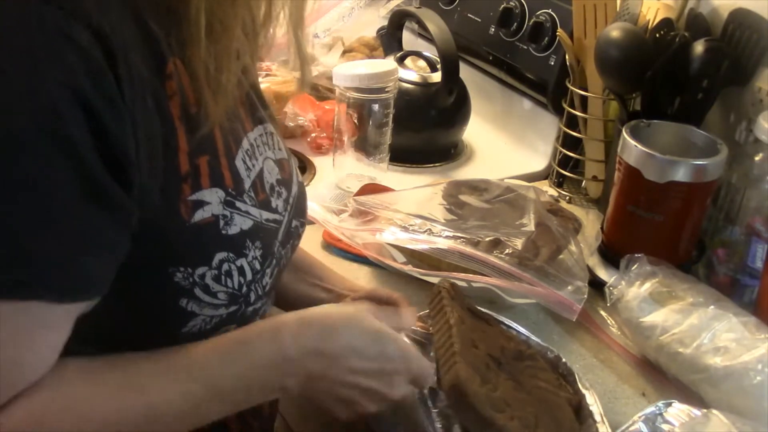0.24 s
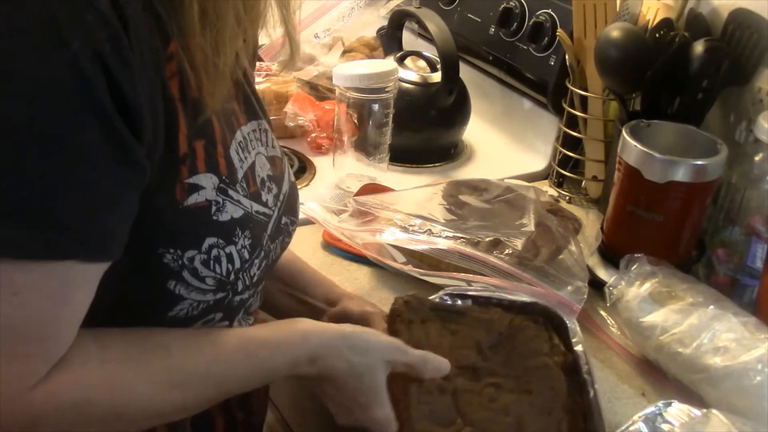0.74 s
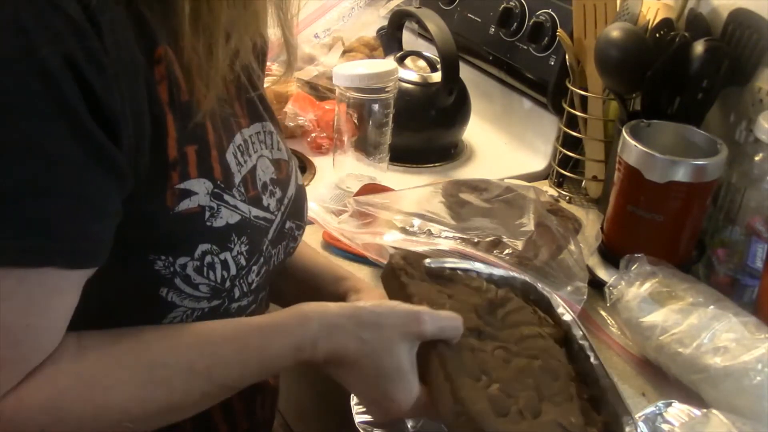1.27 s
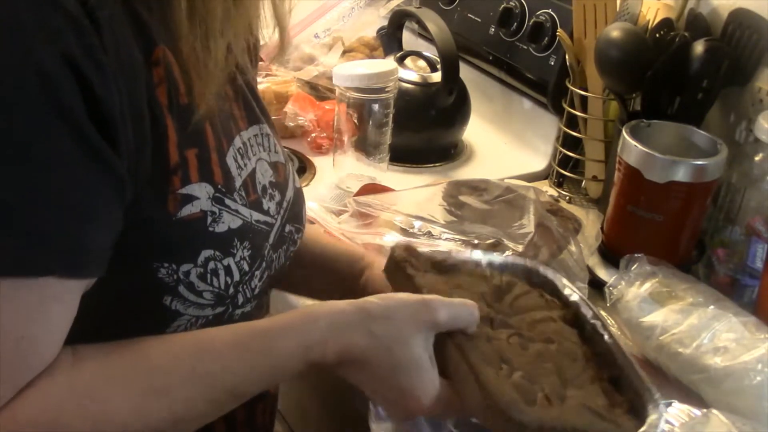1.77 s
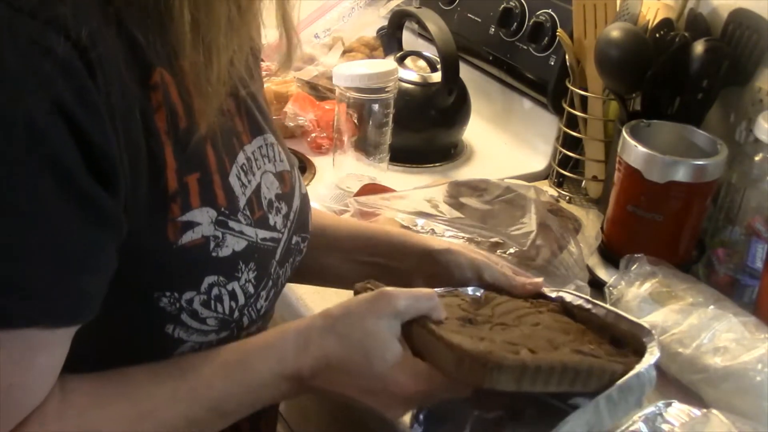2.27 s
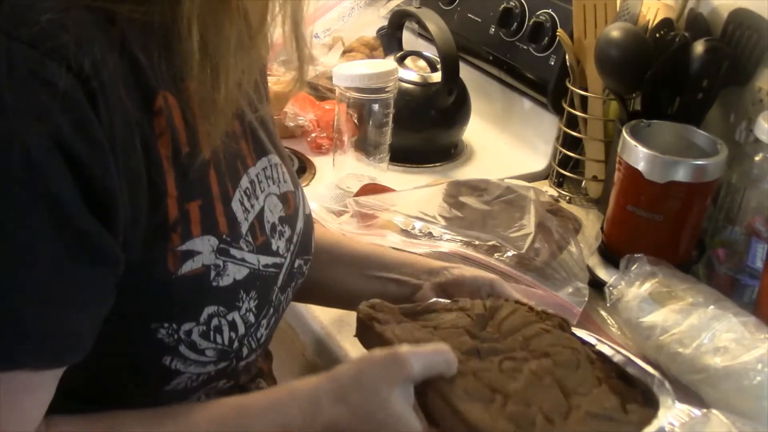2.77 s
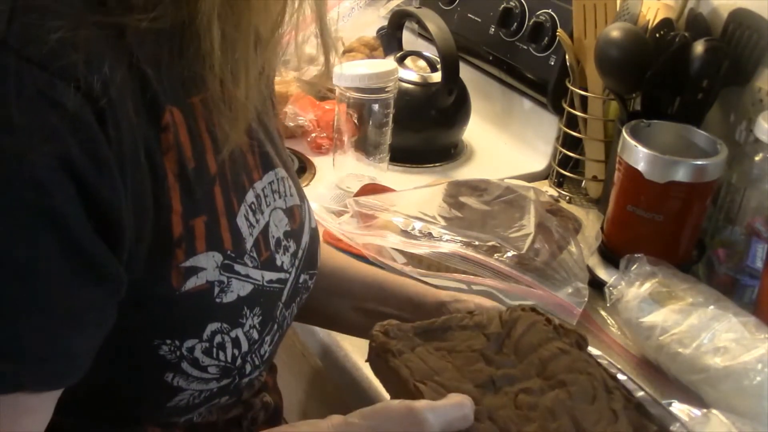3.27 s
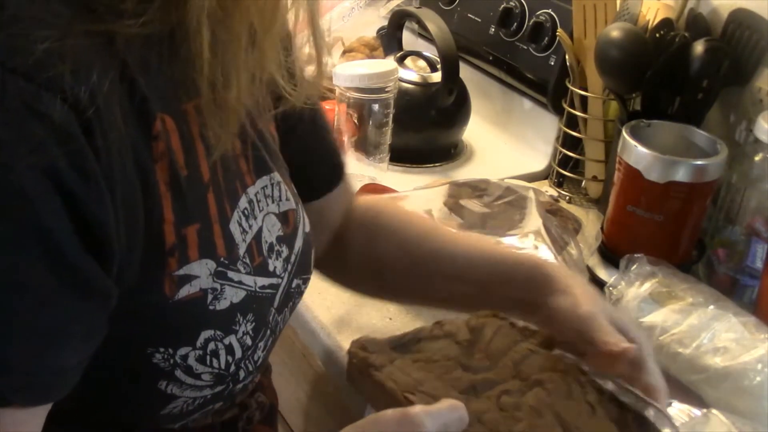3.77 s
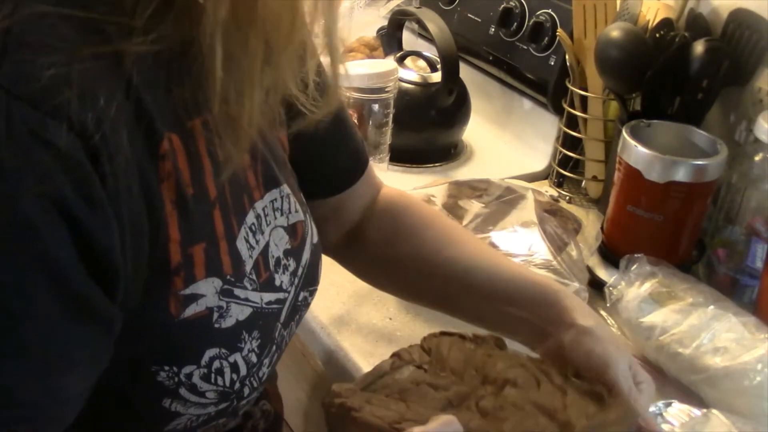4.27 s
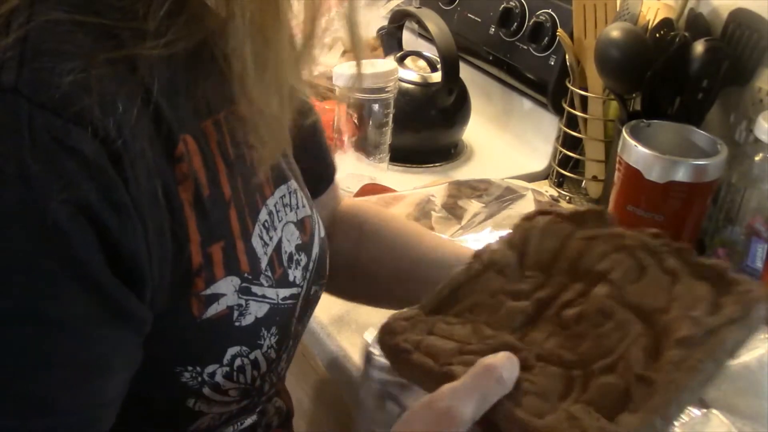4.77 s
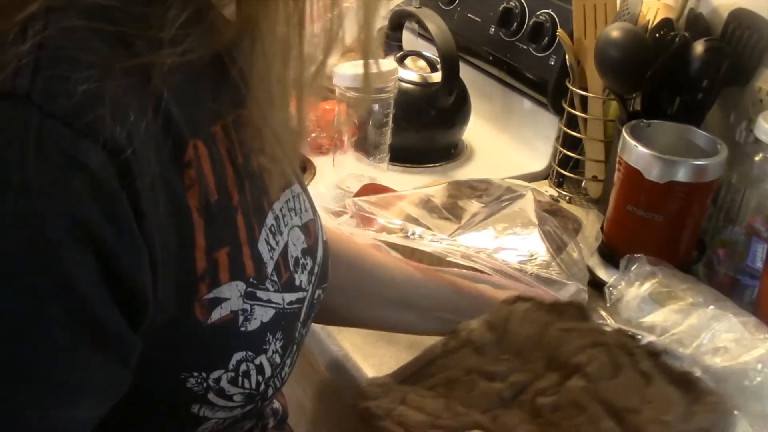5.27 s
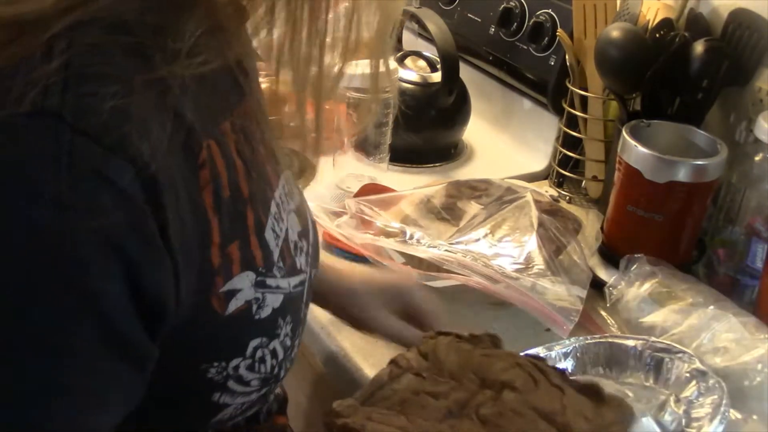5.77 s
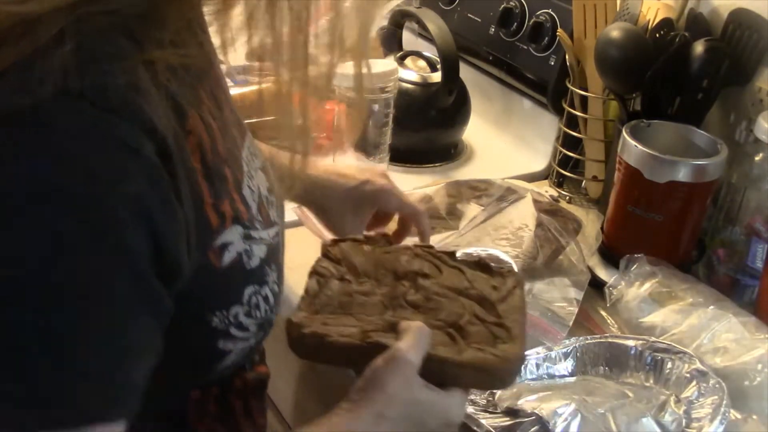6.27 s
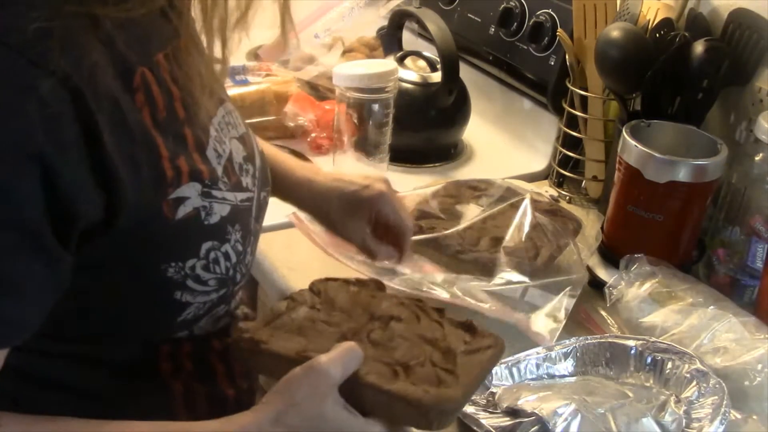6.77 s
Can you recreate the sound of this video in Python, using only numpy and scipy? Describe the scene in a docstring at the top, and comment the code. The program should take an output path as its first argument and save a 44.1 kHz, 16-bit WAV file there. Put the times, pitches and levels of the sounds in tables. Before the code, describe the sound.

A thin foil pan snaps and crackles as it is peeled off a frozen slab, with plastic rustling over a faint hum.

```python
"""Thin foil pans snap and crackle as they are bent, peeled off a frozen slab and set on a counter.
Each buckle pops a dent that shakes the sheet and rings briefly. In between, hands rub the foil,
small creases and a plastic bag rustle, and a pan scrapes the counter. Two brief, faint chirps sound.
The kitchen adds a short tail, an appliance hums underneath, and the peaks are softly limited."""
import sys
import numpy as np
from scipy import signal
from scipy.fft import rfft, irfft
from scipy.io import wavfile
from scipy.ndimage import uniform_filter1d

SR = 44100
rng = np.random.default_rng(int(sys.argv[2]) if len(sys.argv) > 2 else 0)


def dump_mix(stems):
    """Bounce the given channels to the path in sys.argv[1] as a 16-bit WAV at rate SR."""
    frames = np.atleast_2d(stems).T  # one column per channel
    limited = np.clip(frames, -1, 1)  # hard clip at full scale
    pcm = np.round(limited * 32767).astype(np.int16)
    wavfile.write(sys.argv[1], SR, pcm)


N = 310310

# Cue levels are set before the mix faders; EQ curves give shape only.
# buckle cues: t/s, level/dB, dent f/Hz, then relative to that level: body/dB, wall/dB, crack/dB
BUCKLES = [(.14, -20, 5800, -31, -11, -18), (0.159, -21, 5900, -32, -9, -5),
           (0.193, -14.5, 7300, -33, -12, -18), (0.205, -9, 1880, -9.5, -8.5, -9),
           (.219, -22, 1840, -25, -11, -15), (.253, -22, 1880, -30, -14, -9),
           (.349, -20, 1790, -39, -14, -11.5), (.394, -17, 623, -21, -16, -14),
           (.426, -18, 6770, -33, -17, -13), (0.439, -17, 6540, -36, -17, -2.5),
           (.48, -17.5, 1680, -7.5, -14, -10), (0.56, -12, 1900, -17, -16, -16),
           (.595, -19.5, 2020, -19, -7, -9.5), (.611, -17, 7490, -36, -16, -9),
           (.654, -18, 930, -11, -11, -17), (.687, -7, 7830, -29, -26, -13), (.697, -2, 750, -9, -11.5, -5),
           (.714, 4.5, 736, -21, -13.5, -19), (.797, -7.5, 2100, -7, -4, -1),
           (.822, -10, 2400, -29, -4.5, -10), (.829, -2.5, 1580, -18.5, -14, -12),
           (.879, 1, 940, -15, -17, -44), (0.912, -20.5, 988, -29, -21, -8),
           (.958, -28.5, 1640, -23, -7, -3.5), (1.08, -2, 606, -8.5, -12, -9),
           (1.118, -1, 1410, -30, -14, -18), (1.126, -5, 2220, -41, -34, -9.5),
           (1.146, -9, 1600, -12, -5.5, 0.5), (1.16, -7, 1820, -27, -5, -27),
           (1.255, -8, 1310, -32, -11, -24), (1.36, -9.5, 1620, -17.5, -17, -33),
           (1.464, 4, 3020, -42, -26, -18), (1.49, -8.5, 4330, -22, -25, -13.5),
           (1.594, -22.5, 880, -10, -11.5, -12), (1.743, -23, 1050, -21, -11, -9),
           (1.755, -27.5, 1660, -7.5, -1.5, -3), (2.08, -18, 2900, -21, -11, -11.5),
           (2.139, 3.5, 2420, -28.5, -14, -20), (2.196, -16, 1500, -10, -5.5, -17),
           (2.299, 7, 1698, -29.5, -17.5, -19), (2.5, 0, 6030, -26, -14, -10),
           (2.525, 8, 1672, -26.5, -21, -39), (2.574, -8, 6400, -15, -6.5, -1.5),
           (2.646, -7.5, 1460, -12.5, -9.5, -31), (2.74, -4, 2920, -29.5, -15.5, -24.5),
           (2.831, -21.5, 8200, -21, -26, -5.5), (2.898, 0, 1120, -22, -15.5, -20.5),
           (2.944, -13, 1320, -7, -8, -23), (3.02, 5.5, 760, -21, -13.5, -21),
           (3.246, -19, 6250, -12.5, -12.5, -5.5), (3.407, -19, 1620, -5, -15, -19),
           (3.624, -29, 1510, -14, -5.5, -4), (3.715, -28.5, 2740, -16, -8.5, -12.5),
           (3.868, -25.5, 1460, -6, -2, -5), (3.98, -2, 1026, -16, -20.5, -22.5),
           (4.19, 1, 2150, -33, -18, -23.5), (4.214, -8.5, 1390, -17, -17, -16),
           (4.285, 5, 3260, -24, -17, -12), (4.402, -7.5, 1900, -4, 3, -3),
           (5.086, -18, 1270, -4.5, -8, -8.5), (5.119, -.5, 794, -11, -26, -23),
           (5.173, -6, 1160, -0.5, -16, -11.5), (5.244, -1, 965, -13.5, -38, -17),
           (5.287, 0, 835, -11, -20, -21), (5.3, -2, 880, -12, -26, -26), (5.363, 2, 1225, -10.5, -16, -19),
           (5.408, 0.8, 1130, -7.5, -19, -37), (5.43, -5, 766, -3, -15, -21),
           (5.465, -4, 1050, -11.5, -16, -18), (5.489, 1.5, 1184, -9.5, -22, -16.5),
           (5.509, 4.5, 871, -11.5, -22, -25), (5.853, -28, 650, -24, -15, -6.5),
           (5.907, -28.5, 1090, -10, -9, -11.5), (5.967, -26, 904, -11.5, -11.5, -11),
           (6.063, -29.5, 560, -26, -5, 0.7), (6.279, -20.5, 2470, -20, -12.5, -6),
           (6.397, -29, 1020, -24, -4.5, -9.5), (6.458, -25.5, 6350, -20, -12, -2.5),
           (6.533, -29.5, 810, -24, -9.5, -10), (6.601, -27.5, 1440, -18, -10.5, -1),
           (6.715, -33, 4500, -25, -12, -12), (6.806, -27, 2220, -14, -10, -4),
           (6.861, -27.5, 890, -23, -13, -6), (6.898, -23.5, 7060, -27, -14, -5),
           (6.914, -25.5, 2240, -19, -8.5, -6), (6.957, -25.5, 850, -19, -7.5, -7),
           (6.997, -26.5, 2800, -26, -4.5, -9)]
# EQ of a buckle's layers, from the hollow pan body up to the top sizzle: f/Hz, level/dB
BODY_EQ = [(70, -80), (170, -50.5), (300, -15.5), (500, -2.5), (900, 2), (1300, -1), (2200, -6),
           (5000, -47)]
WALL_EQ = [(500, -30), (1100, -4), (1700, 4.5), (2800, 3), (4000, -4), (6000, -16.5), (12000, -45)]
CRACK_EQ = [(2000, -18.5), (4500, -8), (6500, 3), (8500, -3), (11000, -14), (16000, -28)]
SIZZLE_EQ = [(5000, -37), (9000, 4), (11500, -1), (13500, 2), (16000, -11)]
# sizzle fader, relative to the crack: t/s, level/dB
SIZZLE_RIDE = [(0.0, -20), (.45, 0), (.7, -6), (.96, -2.5), (1.08, -18), (2.3, -20), (2.55, -38),
               (2.9, -10.5), (3.9, -4), (4.2, -18), (4.4, -24), (5.1, -5), (7.04, -7)]
# handling faders: t/s, rub level/dB, crackle level/dB
HANDLING_RIDE = [(0.0, -37.5, -39), (.2, -41.5, -32), (.5, -36.5, -45), (.776, -27.5, -22.5),
                 (.92, -44, -43.5), (1.12, -37, -48), (1.32, -28, -32.5), (1.4, -39.5, -55),
                 (1.68, -40.5, -66), (1.87, -40, -48), (2.05, -43, -57.5), (2.54, -31.5, -38),
                 (2.9, -45.5, -60), (3.2, -43.5, -61), (3.7, -40, -49), (4.3, -36, -45.5),
                 (4.416, -28, -20), (4.6, -43.5, -49.5), (4.7, -49, -80), (4.84, -37, -53),
                 (5.08, -43.5, -64), (5.6, -41, -49.5), (5.8, -46, -68), (6.0, -40.5, -50.5),
                 (6.8, -42, -58.5), (6.95, -36, -54), (7.04, -39, -55)]
# EQ of the dull rub and the bright crackle: f/Hz, level/dB
RUB_EQ = [(88, -85), (150, -45), (242, -13), (282, -19), (373, -9.5), (747, -4), (2200, -10.5), (3780, -19),
          (6000, -38), (7800, -78), (13200, -120)]
CRACKLE_EQ = [(1500, -25.5), (4000, -4), (6500, -0.5), (8500, -2.5), (11000, -8), (13500, -11),
              (16000, -16)]
# swells of crackle as a fold slowly gives: centre t/s, length/s, level/dB
FOLD_SWELLS = [(.834, .053, -34), (1.614, 0.067, -39), (1.779, 0.038, -35.5), (1.944, 0.037, -33.5),
               (2.181, 0.045, -30.5), (2.376, 0.065, -45), (2.713, .046, -32), (2.979, 0.084, -30.5),
               (3.458, 0.13, -42.5), (3.75, 0.085, -49), (3.868, 0.037, -37), (3.952, .064, -36.5),
               (4.264, .05, -31.5), (4.8, .04, -50), (4.89, 0.089, -44), (4.965, 0.051, -37),
               (5.206, 0.21, -24.5), (5.452, 0.035, -23.5), (5.984, 0.13, -45.5), (6.545, 0.024, -38.5),
               (6.712, 0.039, -50), (6.946, 0.15, -38.5)]
# pan dragged across the counter: t/s, length/s, start level/dB, end level/dB
PAN_DRAGS = [(5.086, 0.28, -10.5, -18), (5.365, .205, -15.5, -11)]
# chirp cues: t/s, length/s, f/Hz, level/dB
CHIRP_CUES = [(1.79, 0.024, 817, -24.5), (1.956, 0.029, 820, -40)]
# chirp timbre: harmonic number, level/dB
CHIRP_HARMONICS = [(1, -7.5), (2, -2), (3, -14)]
# kitchen decay: f/Hz, T60/s
KITCHEN_DECAY = [(300, 0.22), (800, 0.34), (2000, 0.28), (5500, 0.31), (12000, 0.16)]
# EQ of the appliance's air noise: f/Hz, level/dB
AIR_EQ = [(25, -9), (60, -10), (120, -22.5), (200, -12.5), (350, -2.5), (800, -8), (1200, -7.5),
          (2000, -24.5), (4000, -26), (7000, -29), (11000, -30.5), (16000, -38.5)]
# motor partials: f/Hz, level/dB
MOTOR_HUM = [(254, -54), (508, -58), (1017, -60), (1270, -73)]


def buckle(s, level_db, hz, body_db, wall_db, crack_db, pan_filters):
    """One dent pops and shakes the sheet's crowded modes: the close snap, and a click for the room."""
    crest_db, dent_db, overshoot, tick_gain = 5.0, -12, 1.104, 0.21
    attack_s, attack_cycles = 0.00041, 0.78  # a wide, low dent speaks more slowly
    ring_db, ring_t60_s, ring_detune = -12.5, 0.15, 0.07
    t = np.arange(5000) / SR
    # five noise layers: dent, body, wall, crack, sizzle
    dent_eq = [(hz / 3, -45), (hz / 1.3, -12), (hz / 1.08, 0),
               (hz * 1.08, 0), (hz * 1.3, -12), (hz * 3, -45)]
    filters = np.array([eq_filter(dent_eq)] + pan_filters)
    sizzle_db = crack_db + np.interp(s, *np.transpose(SIZZLE_RIDE))
    gains = gain_of(level_db - crest_db + np.array([dent_db, body_db, wall_db, crack_db, sizzle_db]))
    # harder hits are tighter, and the top end dies first
    t60_s = (0.07 - 0.0012 * level_db) * np.array([0.9, 1.3, 1.0, 0.7, 0.6])
    attack = np.minimum(t / (attack_s + attack_cycles / hz), 1)
    punch = 1 + overshoot * np.exp(-t / 0.0028)
    envelopes = gains[:, None] * attack * punch * gain_of(-60 * t / t60_s[:, None])
    bursts = envelopes * rng.standard_normal(envelopes.shape)
    snap = signal.fftconvolve(bursts, filters, axes=1).sum(0)
    # three clear modes ring around the dent's pitch
    mode_hz = hz * (1 + ring_detune * np.array([[-1], [0], [1]]) * rng.random((3, 1)))
    modes = np.sin(2 * np.pi * (mode_hz * t + rng.random((3, 1)))).sum(0)
    ring_envelope = np.minimum(t / attack_s, 1) * gain_of(ring_db - 60 * t / ring_t60_s)
    add(snap, 0, gains[0] * ring_envelope * modes)
    weights = np.array([0.58, 1.0, -1.18, 0.61, -1.0])  # pan bands alternate; the dent carries less far
    click = (weights * np.linalg.norm(envelopes, axis=1)) @ filters
    add(snap, 0.0004, tick_gain * click)
    return snap, click


def buckles():
    """Every snap of the pans and the bag, on two tracks: close snaps and clicks for the room."""
    snaps, clicks = np.zeros(N), np.zeros(N)
    pan_filters = [eq_filter(eq) for eq in (BODY_EQ, WALL_EQ, CRACK_EQ, SIZZLE_EQ)]
    for s, *cue in BUCKLES:
        snap, click = buckle(s, *cue, pan_filters)
        add(snaps, s, snap)
        add(clicks, s, click)
    return snaps, clicks


def grains(eq, per_s, spread_db, t60_s, hiss):
    """Tiny creases or slips: random noise bursts, a few of them big, over a bed of hiss; rms 1."""
    sizes = gain_of(spread_db * np.minimum(rng.exponential(1, N), 4))
    hits = sizes * (rng.random(N) < per_s / SR)
    decay = gain_of(-60 * np.arange(2000) / SR / t60_s)
    power = signal.oaconvolve(hits ** 2, decay ** 2)[:N]
    envelope = unit_rms(np.sqrt(abs(power))) + hiss
    return unit_rms(signal.oaconvolve(envelope * rng.standard_normal(N), eq_filter(eq))[:N])


def handling():
    """Hands rub and rattle the pan; fine creases crackle and swell as folds give."""
    s, rub_db, crackle_db = np.transpose(HANDLING_RIDE)
    t = np.arange(N) / SR
    rub = grains(RUB_EQ, per_s=280, spread_db=2.6, t60_s=0.042, hiss=0.65)
    crackle = grains(CRACKLE_EQ, per_s=460, spread_db=3.1, t60_s=0.016, hiss=0.7)
    swells = sum(gain_of(db) * np.exp(-8 * ((t - at) / length) ** 2) for at, length, db in FOLD_SWELLS)
    crackle_gain = gain_of(np.interp(t, s, crackle_db)) + swells
    return gain_of(np.interp(t, s, rub_db)) * rub + crackle_gain * crackle


def scrape():
    """The pan floor judders across the counter in quick uneven slips, each a dull knock."""
    attack_s, release_s = 0.013, 0.056
    t, envelope = np.arange(N) / SR, np.zeros(N)
    for s, length, start_db, end_db in PAN_DRAGS:
        gate = np.clip((t - s) / attack_s, 0, 1) * np.clip((s + length - t) / release_s, 0, 1)
        envelope += gate * gain_of(np.interp(t, (s, s + length), (start_db, end_db)))
    return envelope * grains(RUB_EQ, per_s=440, spread_db=3.0, t60_s=0.013, hiss=0.58)


def chirps():
    """Brief tonal chirps: three harmonics on an unsteady pitch near 820 Hz."""
    out = np.zeros(N)
    for s, length, hz, db in CHIRP_CUES:
        t = np.arange(0, length, 1 / SR)
        jitter = 0.025 * unit_rms(uniform_filter1d(rng.standard_normal(len(t)), 150))
        cycles = np.cumsum(hz * (1 + jitter)) / SR
        tone = sum(gain_of(level) * np.sin(2 * np.pi * k * cycles) for k, level in CHIRP_HARMONICS)
        add(out, s, gain_of(db) * unit_rms(tone) * signal.windows.tukey(len(t), 0.6))
    return out


def kitchen(send, patterns=3, sweep_s=0.3):
    """A short room tail, each band at its own decay; moving hands keep shifting the echo pattern."""
    out, sweep = np.zeros(N), 2 * np.pi * np.arange(N) / SR / sweep_s
    for k in range(patterns):
        echoes = np.zeros(SR // 2)
        slots = np.arange(200, len(echoes) - 20, 10)
        echoes[slots + rng.integers(0, 10, len(slots))] = rng.choice([-1., 1.], len(slots))
        hz, t, bands = signal.stft(echoes, SR, nperseg=256)
        decay = gain_of(-60 * t / curve_at(KITCHEN_DECAY, hz)[:, None])
        tail = signal.istft(bands * decay, SR, nperseg=256)[1]
        crossfade = np.sqrt(2 / patterns) * np.cos(sweep + k * np.pi / patterns)  # equal power
        out += signal.fftconvolve(send * crossfade, tail / np.linalg.norm(tail))[:N]
    return out


def appliance(air_db=-51.5, pitch_drift=0.002, waver_db=0.75):
    """The background bed: steady air noise and a faint, slightly wavering motor hum."""
    air_shape = gain_of(curve_at(AIR_EQ, np.fft.rfftfreq(N, 1 / SR)))
    air = irfft(rfft(rng.standard_normal(N)) * air_shape, N)
    drift, *wavers = unit_rms(uniform_filter1d(uniform_filter1d(rng.standard_normal((5, N)), 3000), 3000))
    motor_time = np.cumsum(1 + pitch_drift * drift) / SR
    hum = sum(np.sqrt(2) * gain_of(db + waver_db * waver) * np.sin(2 * np.pi * hz * motor_time)
              for (hz, db), waver in zip(MOTOR_HUM, wavers))
    return gain_of(air_db) * unit_rms(air) + hum


def gain_of(db):
    """Decibels to gain."""
    return 10 ** (np.asarray(db) / 20)


def unit_rms(x):
    """Normalises to rms 1."""
    return x / np.sqrt(np.mean(x ** 2) + 1e-20)


def curve_at(curve, hz):
    """Reads a curve on a log-frequency axis."""
    f, value = np.transpose(curve)
    return np.interp(np.log(hz + 1), np.log(f + 1), value)


def eq_filter(eq, size=2048):
    """Minimum-phase impulse response of an EQ curve, with energy 1."""
    log_gain = np.log(gain_of(curve_at(eq, abs(np.fft.fftfreq(size, 1 / SR)))))
    taps = np.fft.ifft(np.exp(np.conj(signal.hilbert(log_gain)))).real[:size // 2]
    return taps / np.linalg.norm(taps)


def add(track, s, sound):
    """Drops a sound onto a track at s seconds."""
    part = track[round(s * SR):][:len(sound)]
    part += sound[:len(part)]


def scene():
    """Mono mix: snaps up front, smaller sounds tucked under them, kitchen and appliance behind."""
    snaps, clicks = buckles()
    texture = handling() + scrape() + chirps()
    room_send = gain_of(-4) * clicks + gain_of(-13) * snaps + gain_of(-9) * texture
    return (snaps + gain_of(-6.5) * texture + kitchen(room_send) + appliance())[None]


def record(dry, ceiling=0.88, low_cut_hz=220, high_cut_hz=15900):
    """Master chain: soft-clipped peaks, a gentle low cut and a steep high cut."""
    limited = dry / (1 + abs(dry / ceiling) ** 12) ** (1 / 12)
    thinned = signal.lfilter(*signal.butter(1, low_cut_hz, "high", fs=SR), limited)
    high_cut = signal.firwin(161, high_cut_hz, window=("kaiser", 8), fs=SR)
    return signal.oaconvolve(thinned, high_cut[None], "same")


dry = scene()
out = record(dry)
dump_mix(out)
```